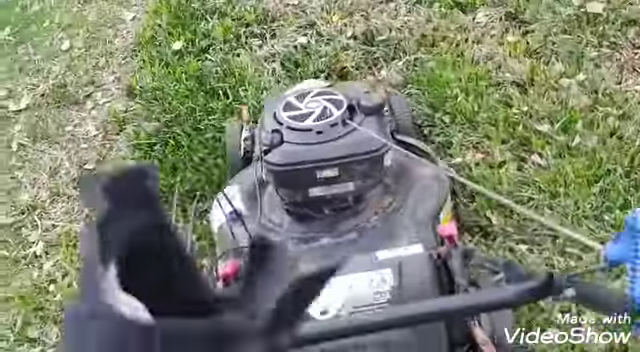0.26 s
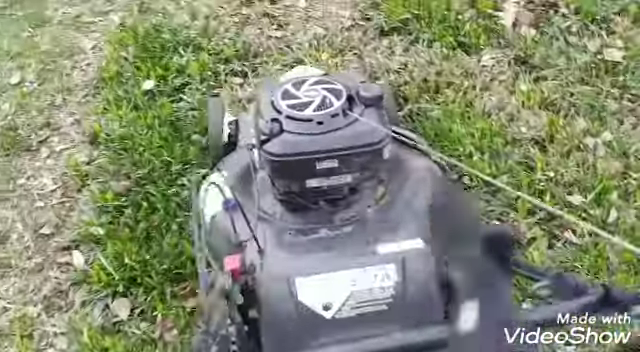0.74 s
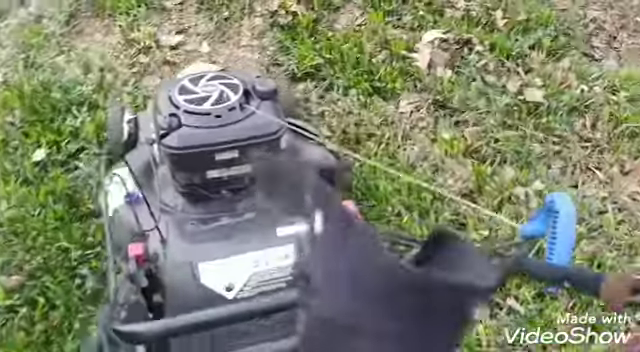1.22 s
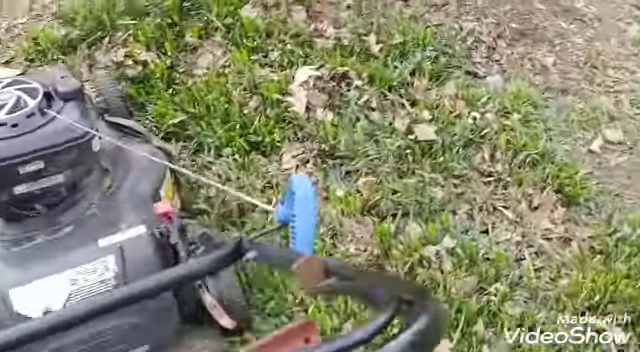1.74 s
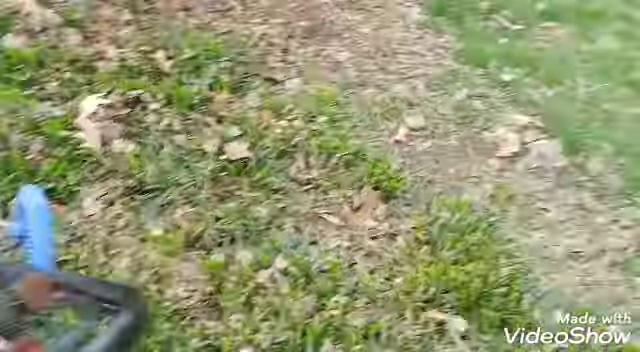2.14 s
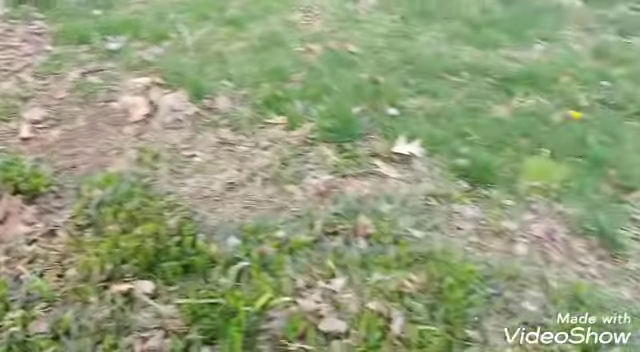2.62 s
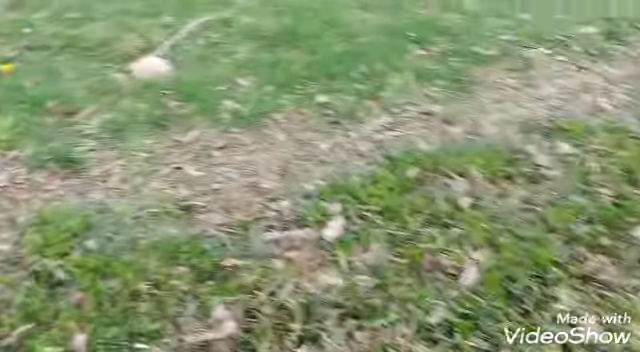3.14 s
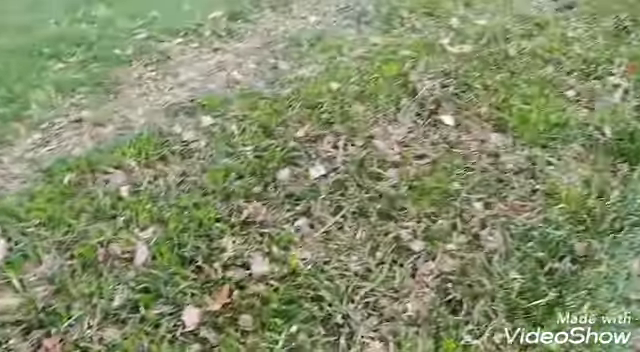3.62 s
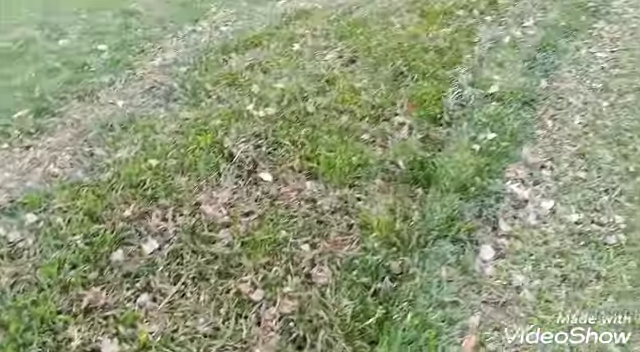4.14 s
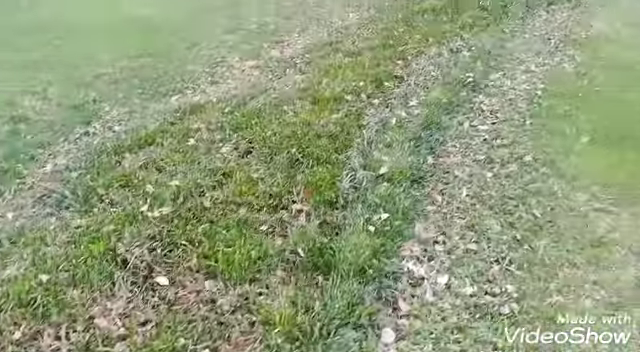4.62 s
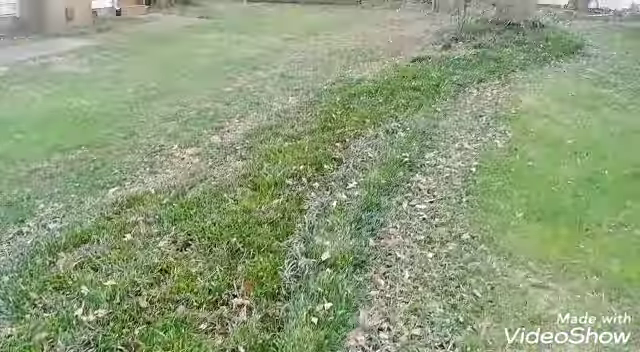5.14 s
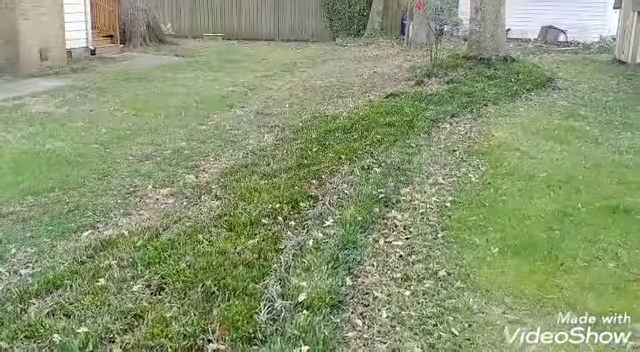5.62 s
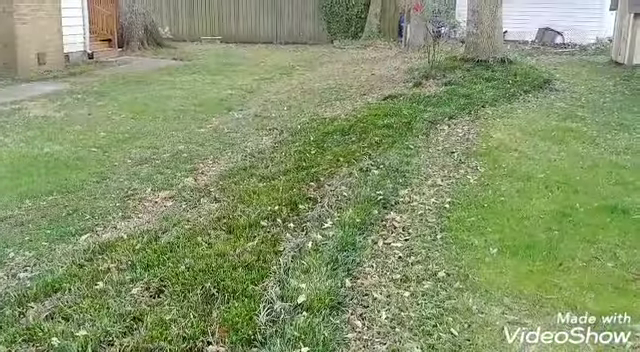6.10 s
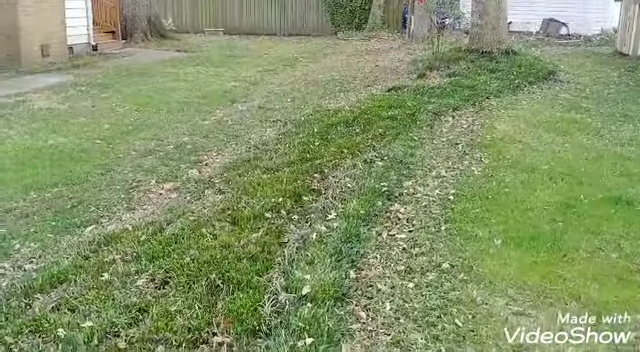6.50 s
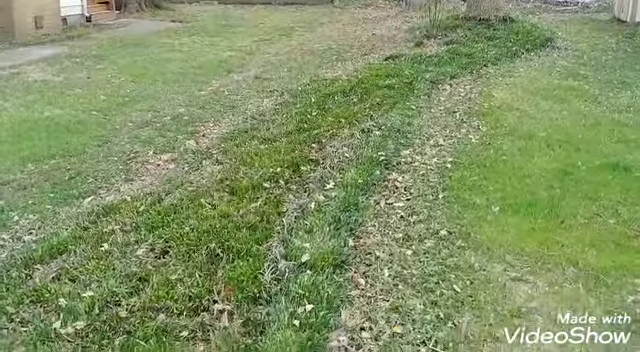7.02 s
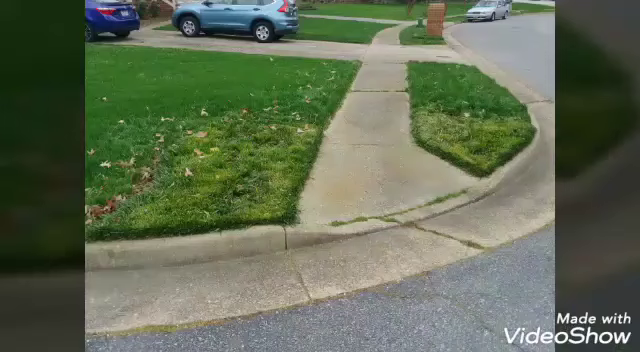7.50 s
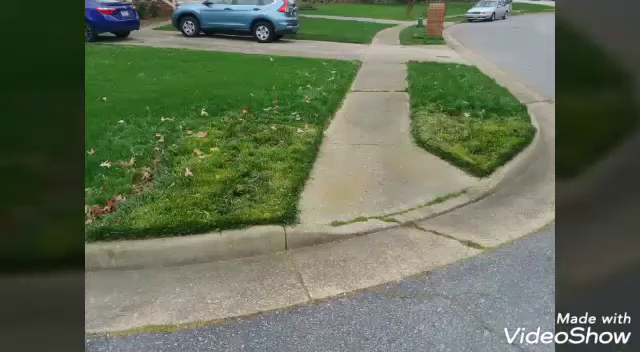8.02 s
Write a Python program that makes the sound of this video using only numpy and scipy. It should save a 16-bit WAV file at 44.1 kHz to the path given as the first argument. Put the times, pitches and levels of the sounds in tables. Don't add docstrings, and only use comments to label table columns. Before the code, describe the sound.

A single-cylinder petrol push mower is already running near full speed, close by on an open lawn. Rapid exhaust thumps merge into a rough drone over a low blade hum and under-deck roar, with buzzing metal, ringing silencer and airy hiss. Stalks and grit tick on the steel. The handheld stereo microphone swings round, shifting the tone, until the sound stops dead near 7.5 seconds and silence follows.

```python
import sys
import numpy as np
from scipy import signal
from scipy.fft import rfft, irfft, next_fast_len
from scipy.io import wavfile
from scipy.ndimage import uniform_filter1d, map_coordinates

SR = 44100
rng = np.random.default_rng(int(sys.argv[2]) if len(sys.argv) > 2 else 0)


def natural_amplitude(level_db):
    exponent = np.asarray(level_db, float) / 20
    return 10 ** exponent


def file_out(sig):
    cols = np.atleast_2d(sig).T
    lim = np.clip(cols, -1, 1)
    pcm = np.round(lim * 32767).astype(np.int16)
    wavfile.write(sys.argv[1], SR, pcm)


N = 364266
T = np.arange(N) / SR


def curves(rows):
    s, *columns = np.transpose(rows)
    return [np.interp(T, s, c) for c in columns]


def unit(x):
    return x / np.sqrt(np.mean(x ** 2))


def bump(at_s, length_s):
    return np.exp(-((T - at_s) / length_s) ** 2)


def ring(x, hz, width_hz):
    return signal.lfilter(*signal.iirpeak(hz, hz / width_hz, fs=SR), x)


def coloured(x, points):
    hz, db = np.transpose(points)
    size = next_fast_len(N)
    bin_hz = np.arange(size // 2 + 1) * SR / size
    gain = natural_amplitude(np.interp(np.log(bin_hz + 1), np.log(hz), db, -90, -90))
    return unit(irfft(rfft(x, size) * gain, size)[:N])


def walk(rate_hz):
    k = int(SR / rate_hz)
    held = np.repeat(rng.standard_normal(N // k + 1), k)
    return 1.54 * uniform_filter1d(uniform_filter1d(held, k), k)[:N]


def puff(cycle, start, rise, fall):
    p = (cycle - start) % 1
    return (1 - np.exp(-p / rise)) * np.exp(-p / fall)


def knock(cycle, at):
    p, out = (cycle - at) % 1, np.zeros(N + 1)
    i = np.flatnonzero(np.diff(p) < 0) + 1
    early = p[i] / np.gradient(cycle)[i]
    out[i - 1], out[i] = early, 1 - early
    return unit(out[:N])


def blend(steady, rough, share):
    share = np.clip(share, 0, 1)
    return np.sqrt(share) * steady + np.sqrt(1 - share) * unit(rough)


def later(x, lag_samples):
    return map_coordinates(x, [np.arange(N) - lag_samples], order=3, mode="nearest")


def ground(x, echo_ms, share):
    dull = signal.lfilter(*signal.butter(1, 2500, fs=SR), x)
    return x + share * later(dull, echo_ms * SR / 1000 - 2)


def ports(x, pan_db, lag_samples, stray=0.):
    treble = signal.lfilter(*signal.butter(2, 2900, "high", fs=SR), x)
    scattered = np.array([np.roll(treble, N // 3), np.roll(treble, -N // 4)])
    direct = np.array([x, later(x, lag_samples)])
    return (direct + stray * scattered) * natural_amplitude(np.array([pan_db, -pan_db]) / 2) / np.hypot(1, stray)


# time in s, right port lag in samples, lawn echo in ms, facing the chute in dB.
PHONE_TURN = [(0.0, 14, 1.3, -0.5), (0.4, 14.3, 1.27, 0), (0.8, 15.1, 1.29, 0), (1.2, 19, 1.23, -1.5),
              (1.6, 22.6, 1, -0.5), (2.0, 21.7, 1.05, -3), (2.2, 22.3, 1.08, 1.5), (2.45, 21.7, 0.98, -0.5),
              (2.8, 20.8, 0.83, 1.5), (3.1, 17.7, 0.52, 3), (3.6, 14.2, 0.77, 2.5), (4.0, 11, 0.52, 3.5),
              (4.4, 8.3, 0.56, 1), (4.8, 7, 0.62, 0.5), (5.3, 6.6, 0.71, 1.2), (6.0, 6.6, 0.67, 0),
              (6.8, 6.5, 0.62, -.5), (7.48, 4.6, 0.58, -.5)]


def phone_turn():
    return curves(PHONE_TURN)


# level at rest in dB, dB per sample of lag, dB per ms of echo, share of the facing dB.
PART_LEVELS = dict(roar=(-26, 0.0448, -0.1, 0.85), thump=(-29.5, -0.07, 7.5, -0.37),
               cover=(-25.5, 0.1, 2, -0.28), can=(-23, -0.04, 1.8, 0.6), cut=(-30.5, 0.1141, -0.3, 1.2),
               fan=(-42, 0.11, 4, 0.7))


def part_levels(turned, near, facing_db):
    return {part: a + b * turned + c * near + d * facing_db for part, (a, b, c, d) in PART_LEVELS.items()}


# left minus right at rest in dB, dB per sample of lag, dB per ms of echo.
PART_PANS = dict(deck=(8.3, -.1, -2.1), cover=(-2.1, -0.32, 3.5), can=(-6.5, -0.5, 10),
             cut=(-5.5, 0.32, 5.7), fan=(-1.3, 0.29, 2.5))


def part_pans(turned, near):
    return {part: a + b * turned + c * near for part, (a, b, c) in PART_PANS.items()}


# time in s, engine cycles per s (a cycle is two shaft turns and four blade tips).
ENGINE_SPEED = [(0.0, 22.836), (0.2, 23.04), (0.8, 23.796), (1.2, 23.859), (1.6, 23.325), (1.8, 23.77),
                (2.2, 24.093), (2.4, 23.967), (3.6, 24.216), (3.8, 24.449), (4.2, 24.075), (5.0, 24.489),
                (5.2, 24.452), (5.6, 24.593), (6.6, 24.739), (7.5, 24.744)]


def engine_cycle():
    return np.cumsum(curves(ENGINE_SPEED)[0]) / SR


def air(points, beat, crackle_db, flicker_db):
    bursts = np.minimum(rng.exponential(size=N // 32 + 1), 4.2).repeat(32)[:N]
    grain = rng.standard_normal(N) * natural_amplitude(crackle_db * uniform_filter1d(bursts, size=32))
    return coloured(grain * beat * natural_amplitude(flicker_db * walk(14)), points)


# frequency in Hz, density in dB per Hz.
HISS_SPECTRUM = [(710, -43), (1200, -3), (1360, -14.5), (1520, -6.5), (2050, -3), (2190, -6.5),
                 (2370, -5.5), (2930, -13.5), (5260, -18), (6570, -28.5), (8540, -22), (10500, -30),
                 (11800, -33.5), (12200, -76), (15900, -102), (22000, -120)]


def hiss(beat):
    return air(HISS_SPECTRUM, beat ** 2.4, crackle_db=2.0, flicker_db=1.27)


# frequency in Hz, density in dB per Hz.
ROAR_SPECTRUM = [(24, -55.5), (40, -20), (146, -15), (193, -6), (215, -17), (243, -14.5), (288, -11.5),
                 (424, -7.5), (578, -7), (799, -15), (1140, -36), (1350, -53.5), (1600, -22.5),
                 (2080, -61.5), (3520, -120)]


def roar(beat):
    return air(ROAR_SPECTRUM, beat, crackle_db=1.0, flicker_db=0.83)


# time in s, peak in dB, low part in dB, left minus right in dB.
STALK_TICKS = [(0.2189, -22, 3, -3.5), (0.237, -23, 8.5, 7.5), (0.258, -22.5, 10.5, 4),
               (0.3361, -18, -2.5, 1), (0.4283, -17, -4.5, -6), (0.8935, -12.5, -9.5, 0),
               (1.19, -18, -3.5, 0.5), (1.276, -5.5, -15, 0), (1.4035, -5, -9, -0.5), (1.509, -1, -12.5, 1),
               (1.5527, -15.5, -2.5, 7.5), (1.7844, -6.5, -11.5, -3), (2.006, -15, -4, 1.5),
               (2.1214, -14.5, -4.5, 3), (2.2523, -18, -5.5, 4.5), (2.338, -14.5, -5.5, 2.5),
               (2.36, -11, -9.5, 7), (2.4573, -17.5, -6.5, 0), (2.9337, -21, -2, 0), (3.008, -8.5, -5.5, 4),
               (3.0784, -18.5, -5.5, 1), (3.1238, -19, -11.5, -7), (3.1507, -14.5, -9.5, 2.5),
               (3.4443, -24, 4, -6), (3.658, -14.5, -3, 4), (4.175, -12, 0.5, -1), (4.8349, -8, -13, -7),
               (4.948, -20, -0.5, -1), (5.0305, -18, -10.5, -7.5), (5.1272, -15, -7, -6)]


def ticks(lag):
    out, tail_s = np.zeros((2, N + 2000)), np.arange(1500) / SR
    shape = (1 - np.exp(-tail_s / 0.00047)) * (np.exp(-tail_s / 0.0021) + 0.39 * np.exp(-tail_s / 0.026))
    cracks = rng.standard_normal((len(STALK_TICKS), 3, 1500))
    for (s, db, low_db, pan_db), crack in zip(STALK_TICKS, cracks):
        start = int(s * SR)
        for ch, (delay, side) in enumerate(((0, 1), (int(lag[start]), -1))):
            hit = (crack[2] + 1.22 * crack[ch]) * shape
            bright = ring(ring(hit, 7500, 3100), 9200, 4300)
            low = natural_amplitude(low_db + 19.5) * ring(hit, 4480, 2800)
            out[ch, start + delay:][:1500] += natural_amplitude(db - 17 + side * pan_db / 2) * (bright + low)
    return signal.sosfilt(signal.butter(6, 10800, fs=SR, output="sos"), out[:, :N])


# frequency in Hz, width in Hz, level in dB.
COVER_MODES = [
    (932.4, 20, 3),
    (1018, 14, 3),
    (1083, 11, 2.5),
    (1110, 11, -0.5),
    (1040, 413, 1.5),
    (1370, 180, -15),
    (1506, 71, -14.5),
]


def cover(cycle, steady):
    gusts = 1.9 + puff(cycle, 0.01, 0.024, 0.21) / .5 + puff(cycle, 0.46, 0.088, 0.19) / .5
    rattle = rng.standard_normal(N) * gusts
    valves = unit(knock(cycle, 0.0537) + .55 * knock(cycle, 0.5533))
    narrow = blend(valves, rattle, steady)
    wide = blend(knock(cycle, 0.0523), rattle, share=0.038)
    out = 0
    for hz, width, db in COVER_MODES:
        drive, gain_db = (narrow, db + 11.9 * (steady - 1.73)) if width < 40 else (wide, db)
        out = out + natural_amplitude(gain_db) * unit(ring(ring(drive, hz, width), hz, 4 * width))
    return unit(out)


# frequency in Hz, width in Hz, level in dB, lateness in cycles,
# gain in dB per sample of port lag.
SILENCER_MODES = [
    (1765, 81, -7.5, 0.0441, 1.12),
    (1925, 96, 1, 0.0519, -0.18),
    (2173.5, 65, 1.5, 0.0342, -0.22),
    (2233, 49, 1.5, 0.05064, 0.3),
    (2568, 150, -4, .04, 0.25),
]


def silencer(cycle, lag):
    gas, out = rng.standard_normal(N), 0
    for hz, width, db, late, facing_db in SILENCER_MODES:
        jet = gas * (.3 + puff(cycle, late - .01, .02, .09) / .3)
        drive = blend(knock(cycle, late), jet, share=.82 if hz < 2400 else .25)
        swell = ring(ring(drive, hz, 2.3 * width), hz, 2.3 * width)
        out = out + natural_amplitude(db + facing_db * (lag - 12.0)) * unit(ring(swell, hz, width))
    return unit(out)


# multiple of the cycle, level in dB.
FIRING_HARMONICS = [(1, -50), (2, -19), (3, -36.5), (4, -14), (5, -13), (6, -11), (7, -40), (8, 0),
                    (9, -20.5), (10, -20.5), (11, -21), (12, -8), (13, -20.5), (14, -16.5), (15, -17),
                    (16, -6), (17, -22), (18, -17.5), (19, -24), (20, -21), (21, -23.5), (22, -28.5),
                    (23, -28.5), (24, -19), (26, -27.5), (28, -23)]


def firing(cycle):
    sway, out = walk(10), 0
    for k, db in FIRING_HARMONICS:
        if k in (8, 12, 16):
            continue
        level = np.sqrt(2) * natural_amplitude(db + 0.14 * k * np.roll(sway, 9001 * k))
        turns = k * (cycle - .13) + .021 * k * k + 0.0055 * k * np.roll(sway, -7001 * k)
        out = out + level * np.cos(2 * np.pi * turns)
    return out


# hidden level in dB, clear level in dB, clear from in s, change lasting in s.
SKIRT_CLEARING = [
    (-31, -24, 4.2, 0.28),
    (-44.5, -21, 2.7, 0.12),
]
# time in s, length in s, level in dB.
THIRD_FLARES = [(0.16, 0.14, -30.5), (0.448, 0.086, -23), (0.73, 0.041, -24.5), (1.163, 0.15, -20.5),
                (1.548, 0.079, -21), (1.752, 0.056, -23), (1.995, 0.061, -21), (2.23, 0.078, -26),
                (2.55, 0.16, -22), (2.82, 0.12, -20.5), (3.49, .08, -30)]
FOURTH_FLARES = [
    (0.55, 0.09, -26.5),
    (0.86, 0.15, -26),
    (1.62, 0.12, -29),
    (2.22, 0.14, -28),
    (3.2, 0.55, -32),
    (4.15, 0.088, -28.5),
]


def upper_overtones():
    levels_db = []
    for (hidden_db, clear_db, at, lasts), flares in zip(SKIRT_CLEARING, (THIRD_FLARES, FOURTH_FLARES)):
        gain = natural_amplitude(hidden_db + (clear_db - hidden_db) * np.clip((T - at) / lasts + .5, 0, 1))
        gain = gain + sum(natural_amplitude(db) * bump(s, length) for s, length, db in flares)
        levels_db.append(20 * np.log10(gain))
    return levels_db


# time in s, level in dB.
BLADE_HUM = [(0.0, -9.5), (0.35, -15), (0.72, -12), (0.86, -15.5), (1.0, -12), (1.25, -11), (1.39, -18.5),
             (1.52, -10.5), (1.85, -11), (2.0, -15), (2.2, -16), (2.6, -14), (3.0, -19), (3.3, -20.5),
             (3.75, -18), (4.0, -15.5), (4.5, -16), (5.4, -15)]


def blade(cycle):
    shake, out = .006 * walk(40), 0
    for k, db in zip((2, 3, 4), (curves(BLADE_HUM)[0], *upper_overtones())):
        level = np.sqrt(2) * natural_amplitude(db + 0.285 * k * walk(30))
        out = out + level * np.cos(2 * np.pi * k * (4 * cycle - .1 + shake))
    return out


def scene():
    cycle = engine_cycle()
    lag, echo_ms, facing_db = phone_turn()
    turned, near = lag - 6, echo_ms - .6
    steady = np.clip(1 - 1.3 * near, 0, 1)
    db, pan = part_levels(turned, near, facing_db), part_pans(turned, near)
    shadow_db = -6 * bump(2.72, 0.19)
    beat = 1 + 0.41 * puff(cycle, 0.0082, 0.014, 0.15) + 0.64 * puff(cycle, .5, 0.022, 0.033)

    air_hiss = hiss(beat)
    cut = signal.sosfilt(signal.butter(4, 6500, fs=SR, output="sos"), air_hiss)
    fan = signal.sosfilt(signal.butter(4, 6500, "high", fs=SR, output="sos"), air_hiss)
    deck = natural_amplitude(db["roar"] + 3.5) * roar(beat) + natural_amplitude(0.61 * db["thump"] + 1.0) * firing(cycle)

    out = natural_amplitude(db["fan"] + 1.46) * ports(unit(fan), pan["fan"], lag, stray=4.2)
    out += natural_amplitude(db["cut"] + 8) * ports(ground(unit(cut), echo_ms, share=0.09), pan["cut"], lag, stray=1.0)
    out += ticks(lag)
    out += natural_amplitude(db["cover"] + shadow_db + 1.0) * ports(cover(cycle, steady), pan["cover"], 0.89 * (lag - 6))
    out += natural_amplitude(db["can"] - 2.53) * ports(silencer(cycle, lag), pan["can"], lag)
    out += ports(ground(deck, echo_ms, share=0.36), 0.4 * pan["deck"], 0.37 * lag + 2.4)
    out += ports(blade(cycle), 0.18 * pan["deck"], 0.46 * lag + 4.1)
    return out


def starved_top(x, edges_hz=(9900, 10300, 10700, 11100, 11500, 11900, 12400), limit_db=-58):
    size = next_fast_len(N)
    spectrum, hz = rfft(x, size), np.arange(size // 2 + 1) * SR / size
    out = irfft(spectrum * (hz < edges_hz[0]), size)[:, :N]
    for lo, hi in zip(edges_hz, edges_hz[1:]):
        band = irfft(spectrum * ((hz >= lo) & (hz < hi)), size)[:, :N]
        power = uniform_filter1d(band ** 2, size=1024)
        heard = power * natural_amplitude(5 * walk(40)) > natural_amplitude(2 * limit_db)
        out = out + band * uniform_filter1d(1. * heard, size=300)
    return out


def roll_off(x):
    return signal.sosfilt(signal.butter(12, 12390, fs=SR, output="sos"), x)


def record(dry):
    cut_s = 7.48165
    x = np.array([signal.lfilter(*signal.butter(1, hz, "high", fs=SR), x) for x, hz in zip(dry, (105, 15))])
    x = signal.lfilter(*signal.butter(1, 8, "high", fs=SR), np.tanh(.8 * x) / .8)
    x = starved_top(x)
    after_s = np.maximum(T - cut_s, 0)
    smear = natural_amplitude(-50) * np.exp(-(after_s / .006) ** 4) * ring(rng.standard_normal((2, N)), 200, 500)
    offset = natural_amplitude(-80) * np.exp(-after_s / .2)
    x = np.where(T < cut_s, x * np.clip((cut_s - T) / .0004, 0, 1), smear + offset)
    return roll_off(x)


dry = scene()
out = record(dry)
file_out(out)
```